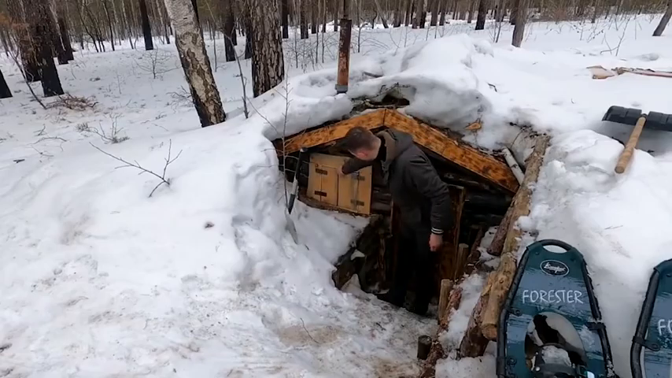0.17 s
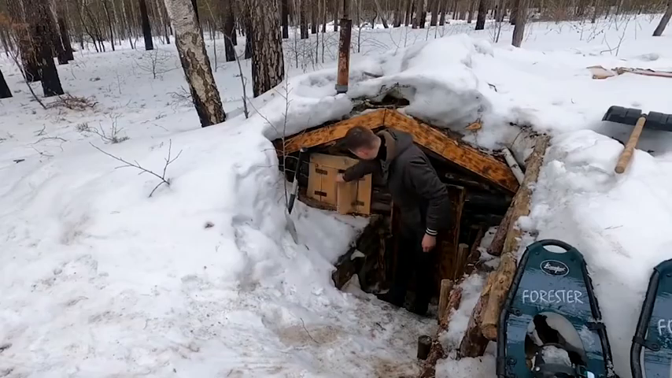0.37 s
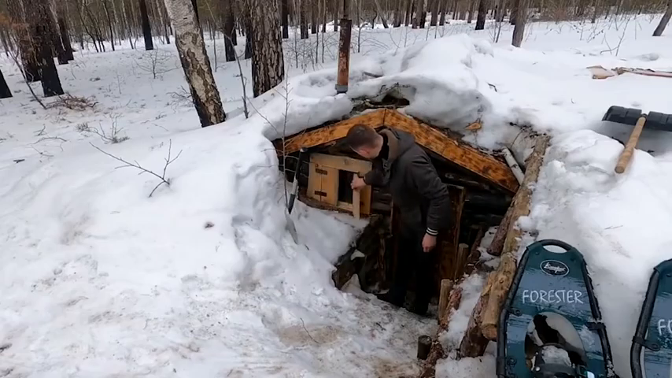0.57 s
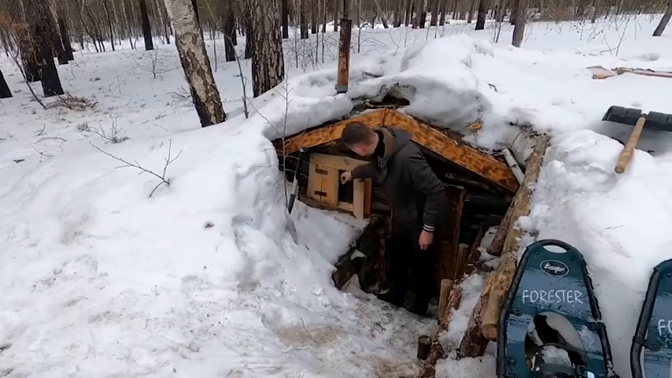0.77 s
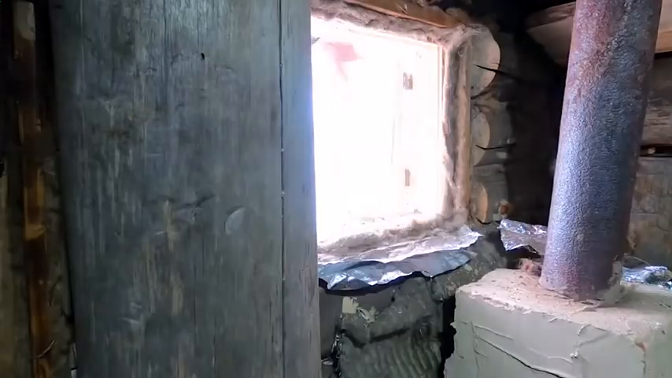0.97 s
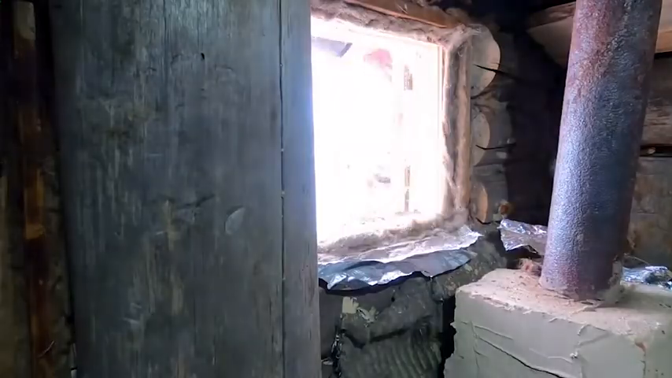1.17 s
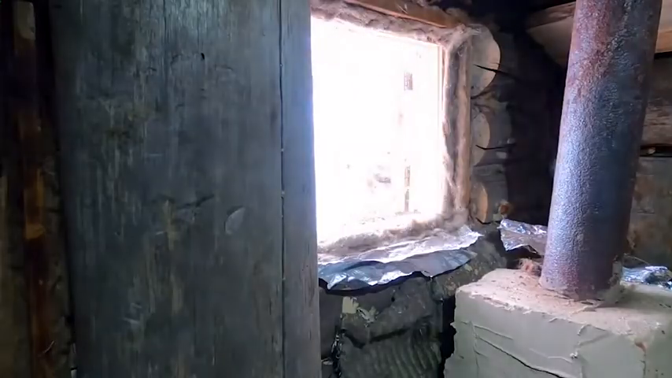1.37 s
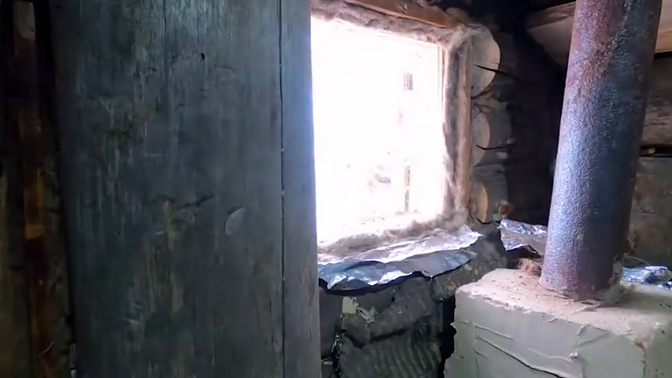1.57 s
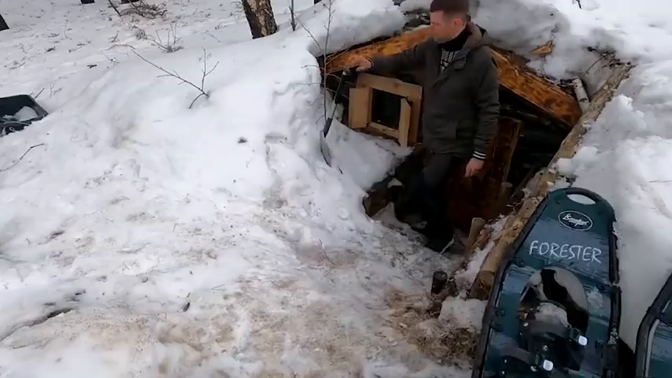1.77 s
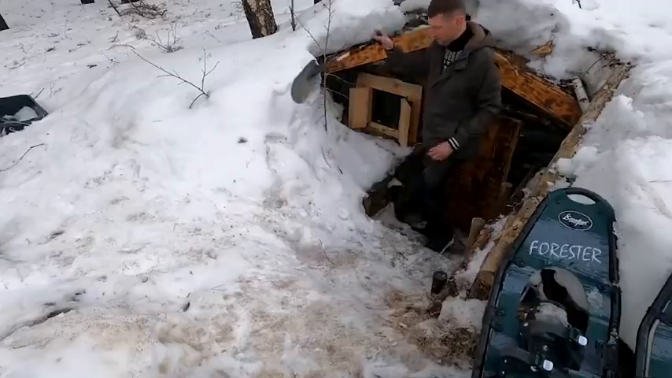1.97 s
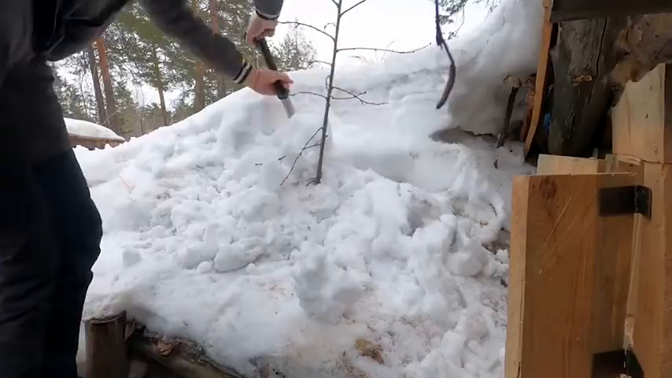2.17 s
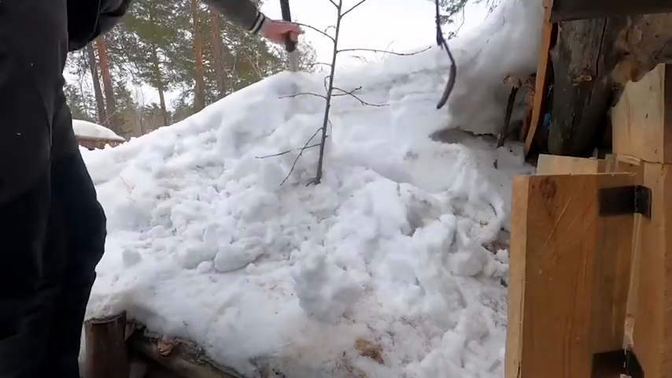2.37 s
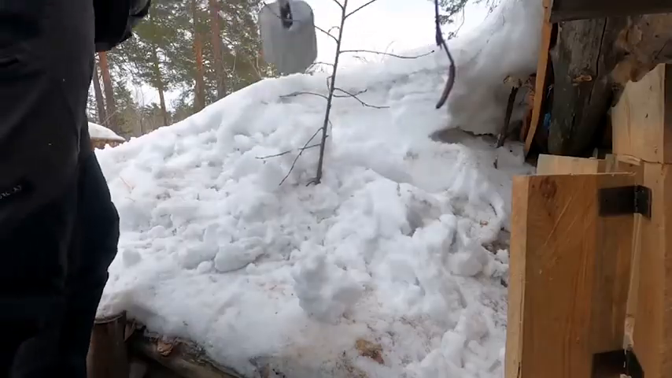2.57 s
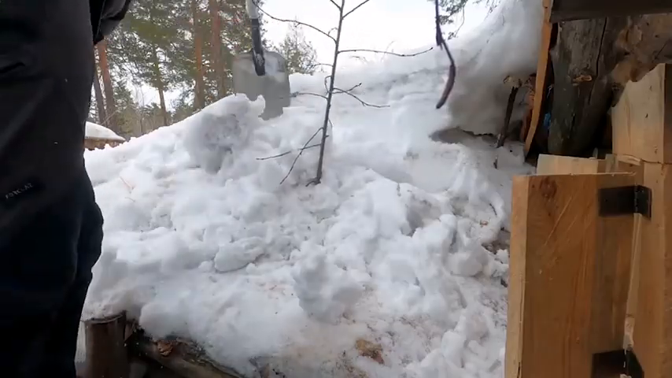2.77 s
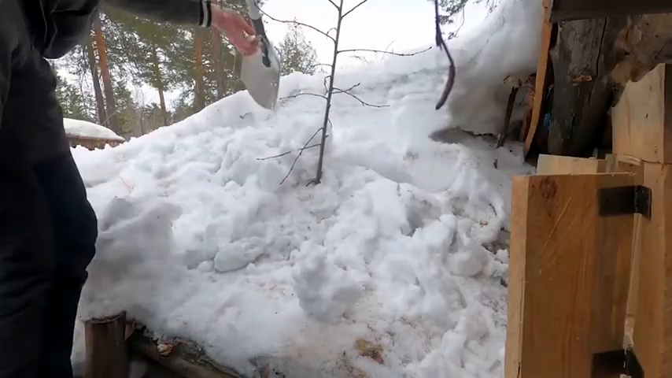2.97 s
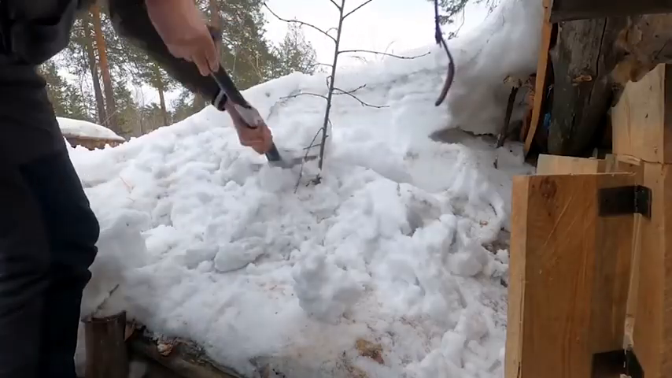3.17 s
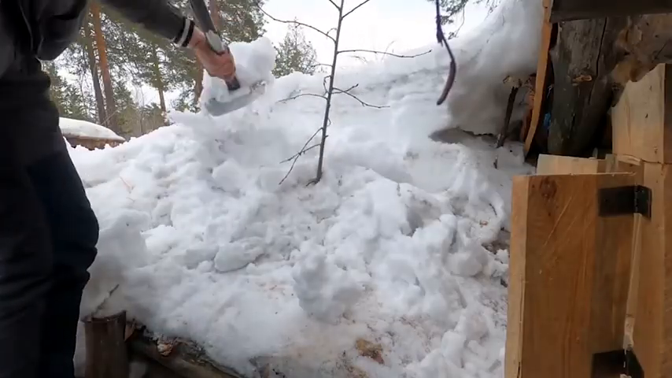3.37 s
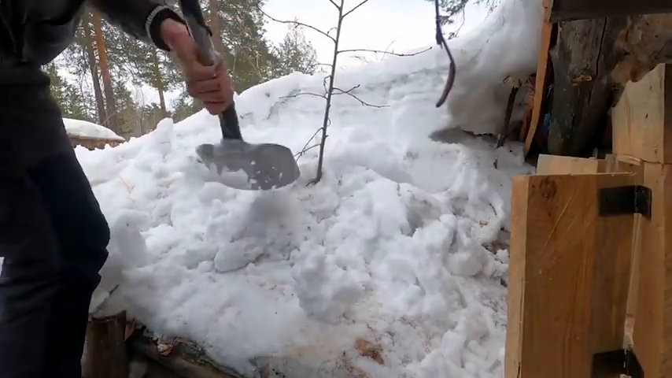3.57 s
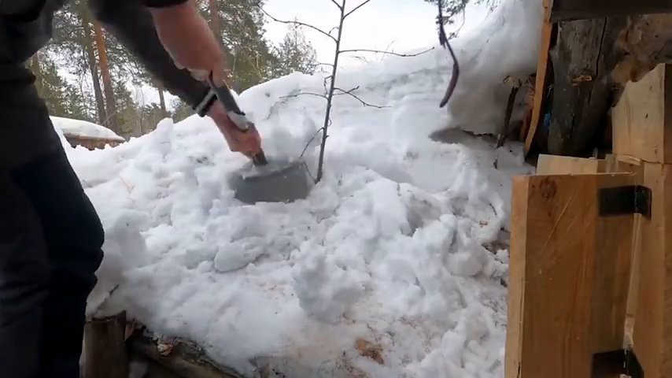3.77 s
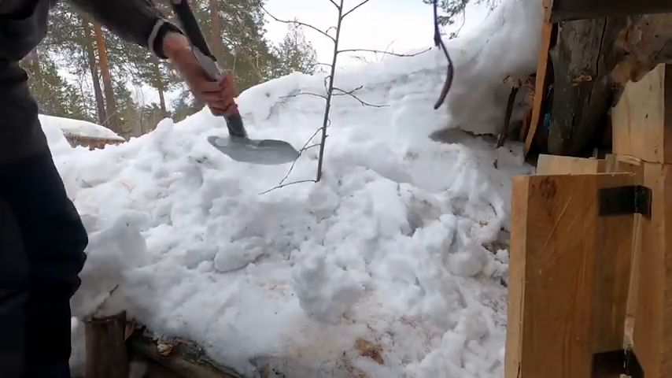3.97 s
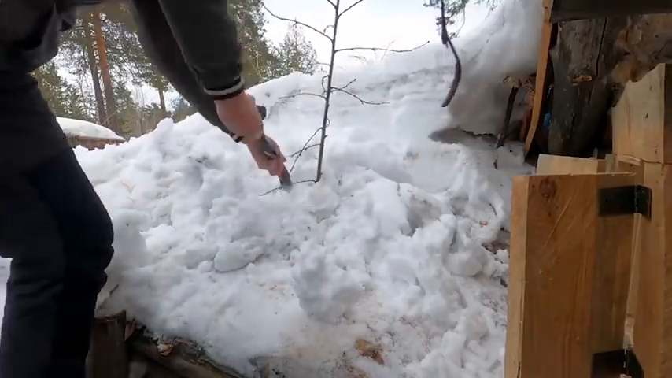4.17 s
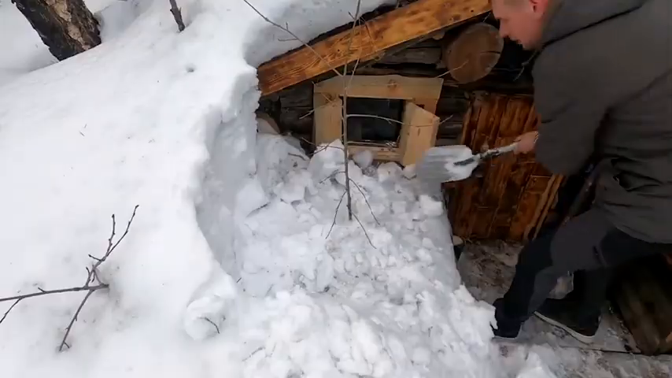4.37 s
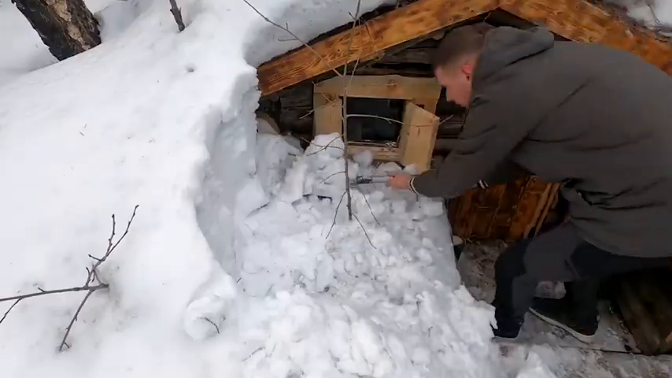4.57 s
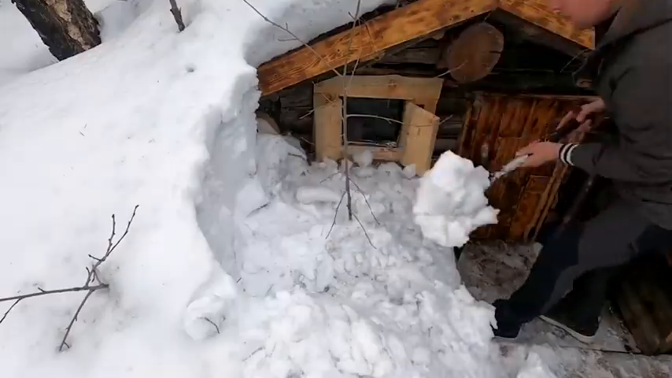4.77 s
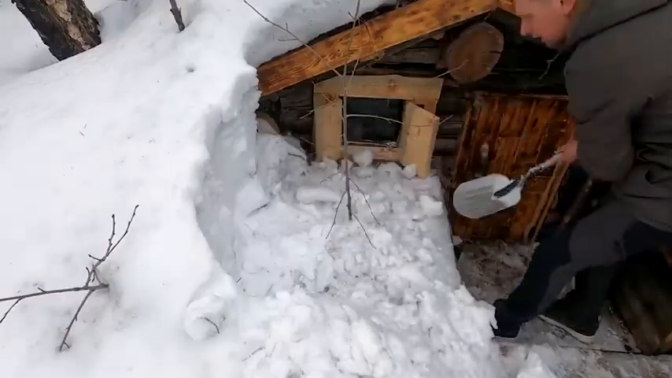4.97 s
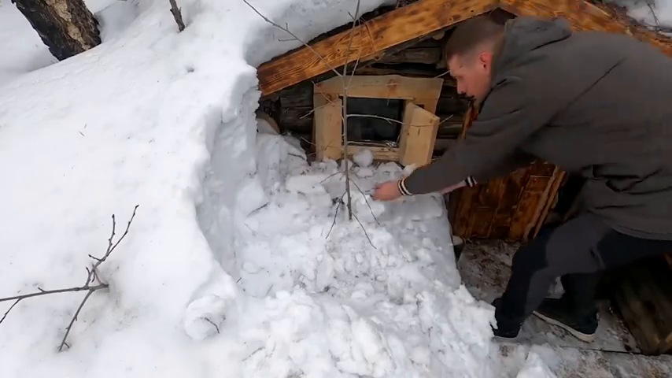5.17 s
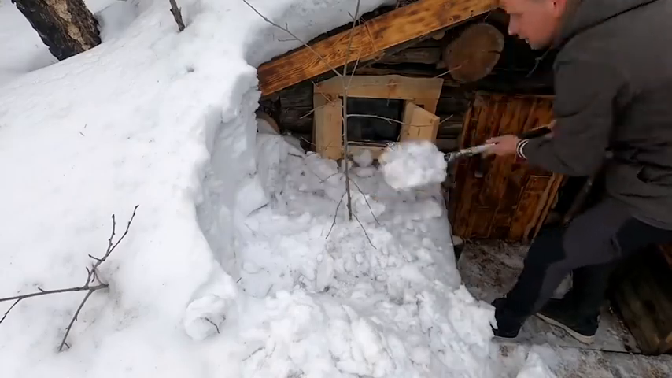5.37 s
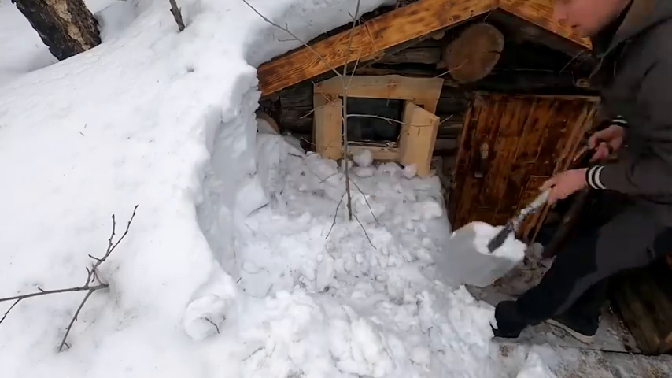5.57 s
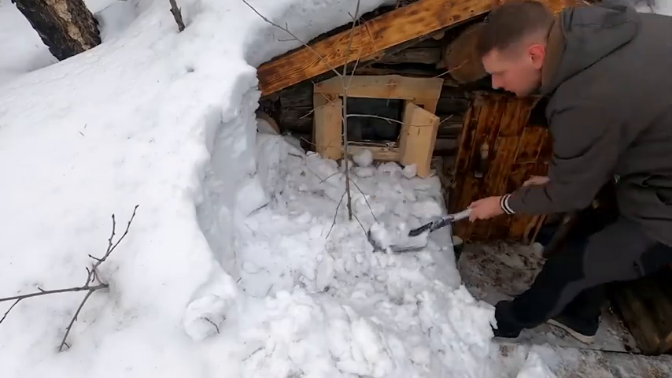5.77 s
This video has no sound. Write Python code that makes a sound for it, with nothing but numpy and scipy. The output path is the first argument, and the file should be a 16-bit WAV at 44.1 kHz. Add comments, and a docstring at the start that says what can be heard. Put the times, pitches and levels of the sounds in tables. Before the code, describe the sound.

Faint rustling and a short latch click open over soft forest air, followed by a dull knock of a wooden shutter from inside a quiet hut. Then a small metal shovel starts biting into packed snow near the microphone, stroke after stroke. The crust cracks, the blade colours each crunch with a slight metallic tone, and loose snow trickles between strokes. Soft thuds come through the ground, and low wind rumble touches the microphone late on.

```python
"""A small metal shovel chops, scrapes and tosses packed snow outside a wooden hut in a winter forest.
Brittle fracture makes dense clicks that the blade's resonances colour; crust snaps, loose snow slides.
Before the digging a latch clicks and a wooden shutter knocks, heard from indoors, both ringing in
damped modes. Under the forest hush the strokes thud through the ground, and from about 4.8 s wind
buffets the microphone."""
import sys
import numpy as np
from scipy import signal
from scipy.fft import rfft, irfft
from scipy.io import wavfile
from scipy.ndimage import uniform_filter1d

SR = 44100
rng = np.random.default_rng(int(sys.argv[2]) if len(sys.argv) > 2 else 0)


def int16_out(signal):
    """Quantize to a 16-bit WAV file."""
    q = np.round(np.clip(np.atleast_2d(signal).T, -1, 1) * 32767)
    wavfile.write(sys.argv[1], SR, q.astype(np.int16))


N = 256774
STEP = 16  # samples per point of a slow envelope
CREST_DB = 10  # peaks of noise over its mean level


# blade biting snow: start_s, level_db, relative fizz_db, body_db and thud_db, rise_s, t60_s
BITES = [(2.1458, -31.5, 6.5, -9, -17.5, 0.029, 0.027), (2.223, -45.5, -7, -18, -1, 0.04, 0.061),
         (2.264, -28, -0.5, -21, -41, .018, .11), (2.3885, -10.5, -3, -5, -16.5, 0.019, 0.13),
         (2.4192, -12.5, -6, -13, -3.5, 0.0063, 0.04), (2.505, -33, -1, -4, -1.5, .0074, .072),
         (2.535, -16, -5.5, -1.5, -18, 0.028, 0.065), (2.564, -21, -.5, -19, -39, 0.0078, .04),
         (2.621, -23, 3.5, -12, -23, 0.052, 0.03), (2.6373, -12, -11, -2, -16, 0.026, 0.035),
         (2.665, -18, -2, -7, -9, 0.01, 0.085), (2.7594, -20.5, -5.5, -9.5, -23.5, 0.025, 0.073),
         (2.802, -25.5, -2.5, -3, -22, 0.021, .04), (2.883, -5.5, -5, -11, -18, 0.016, 0.11),
         (3.035, -24.5, -12, -19, -24, 0.017, 0.11), (3.107, -6, -7, -10, -19.5, 0.023, 0.1),
         (3.131, -17, 5, -5.5, -36, 0.014, 0.07), (3.225, -18, -6, -30, -27.5, 0.02, 0.13),
         (3.417, -24.5, -8, -20, -15.5, 0.058, 0.094), (3.44, -12, 4, -14, -18.5, 0.022, 0.089),
         (3.583, -25.5, -2, -10.5, -31, 0.069, 0.042), (3.613, -24, 1.5, -34, -23, 0.018, 0.26),
         (3.7176, -15, -2.5, -19.5, -25, 0.033, 0.089), (3.8318, -12.5, -2, -7.5, -17, 0.015, 0.091),
         (3.8744, -10.5, 4.5, -14.5, -23.5, 0.06, 0.075), (3.997, -28.5, -8, -8, -17, 0.016, 0.067),
         (4.142, -20, 1, -24, -28.5, 0.012, 0.052), (4.174, -36.5, 7, -7, -9, .012, 0.079),
         (4.264, -23.5, 5, -40, -14.5, 0.013, 0.15), (4.316, -16, 8.5, -12.5, -23, 0.035, 0.093),
         (4.527, -22.5, 0, -40, -40, .056, 0.27), (4.581, -14.5, -5, -11, -28.5, 0.036, 0.13),
         (4.6949, -17, 7, 5.5, -44, .015, 0.086), (4.731, -14, -5.5, 2, -18, 0.073, 0.1),
         (5.111, -26.5, -13, -19, -41, 0.04, 0.053), (5.128, -16, 3, -5.5, -28, 0.027, 0.083),
         (5.247, -21.5, 2.5, -11, -14.5, 0.035, 0.035), (5.316, -11, 0.5, -14, -45, 0.024, 0.13),
         (5.3414, -8.5, -7, -1, -25.5, 0.016, 0.15), (5.4072, -13, -17, 1, -27, 0.021, .055),
         (5.479, -25, -36, -4.5, -29, .01, .11), (5.569, -42, 7, -25, -11, .037, 0.042),
         (5.757, -22.5, 4.5, -11, -8, 0.042, 0.064)]
def shovel(hold_s=.008, move_s=4.45):
    """Fracture under load: each bite crushes snow in three noise bands and thumps the packed bank."""
    body, middle, fizz, thud = np.zeros((4, 2, N))
    for s, db, fizz_db, body_db, thud_db, rise, t60 in BITES:
        pan = sides(-0.1 if s < move_s else -1.5)  # further right once the listener moves
        start = s - 0.59 * rise
        push = amp(db - CREST_DB) * pan * swell(rise, hold_s, t60, 1.06)
        brush = amp(db - 39.5) * pan * swell(0.017, 0, 0.018)  # the edge meets loose powder first
        add(middle, start - .016, brush)
        add(fizz, start - .016, brush * amp(fizz_db))
        add(middle, start, push)
        add(fizz, start, push * amp(fizz_db))
        add(body, start, push * amp(body_db))
        add(thud, start, amp(db + thud_db) * swell(rise, hold_s, 1.7 * t60)[None])
    bank = stereo(rng.standard_normal((2, N)), lambda hz: -12 * np.log2(hz / 190 + 0.00097) ** 2,
                  SNOW_COHERENCE)
    crunch = grains(per_s=8000, spread_db=1.9, patchy_db=4.5)
    return (np.array([body, middle, fizz]) * crunch).sum(0) + thud * unit_rms(bank)


# spectrum of breaking snow: frequency_hz, density_db
CRUNCH_SPECTRUM = [(240, -17), (400, -6.5), (620, -9), (770, -10), (900, -5.5), (1630, -5), (2390, -10),
                   (2540, -10.5), (3450, -6), (5290, -13.5), (8000, -15.5), (11500, -16.5), (13000, -30),
                   (15400, -63)]
# blade resonances: pitch_hz, width_hz, lift_db
BLADE_MODES = [(635, 62, 8), (990, 19, 2.5), (1283, 18, 3.5), (1652, 80, 1.5), (1895, 340, 3),
               (2110, 60, 5), (2323, 33, 10.5), (2783, 110, 3.5), (3580, 22, 2), (3740, 24, -5),
               (4860, 24, 12.5), (5340, 42, 7.5), (5410, 37, 6)]
def crunch_db(hz):
    """Resonance: the metal blade shapes the broad spectrum of breaking snow in narrow bands."""
    blade_db = sum(db / (1 + (2 * (hz - pitch) / width) ** 2) for pitch, width, db in BLADE_MODES)
    return curve(CRUNCH_SPECTRUM, hz) + blade_db


# left-right likeness of the snow: frequency_hz, coherence
SNOW_COHERENCE = [(60, 0.92), (180, 0.98), (550, 0.96), (1650, 0.65), (4960, 0.28), (15000, 0.22)]
def grains(per_s, spread_db, patchy_db):
    """Shot noise: crystals fracture as random clicks, a few large; returns body, middle and fizz."""
    size = amp(spread_db * np.minimum(rng.exponential(1, (2, N)), 3)) * rng.standard_normal((2, N))
    clicks = size * (rng.random((2, N)) < per_s / SR)
    crunch = stereo(clicks, crunch_db, SNOW_COHERENCE)
    # snow damps different parts of the blade in turn, so narrow bands drop out and return
    frames = signal.stft(crunch, nperseg=1024, noverlap=768)[2]
    patches = uniform_filter1d(rng.standard_normal(frames.shape[1:]), size=2, axis=0)
    patches = unit_rms(uniform_filter1d(patches, size=9, axis=1))
    frames *= amp(patchy_db * np.minimum(patches, 1.5))
    spectrum = rfft(signal.istft(frames, nperseg=1024, noverlap=768)[1][:, :N])
    hz = np.fft.rfftfreq(N, 1 / SR)
    low, high = 1 / (1 + (hz / 980) ** 8), 1 / (1 + (3500 / (hz + 1)) ** 4)
    return [unit_rms(irfft(spectrum * share, N)) for share in (low, 1 - low - high, high)]


# crust breaking: start_s, peak_db, pitch_hz, t60_s, pan_db
SNAPS = [(2.395, -7, 1630, 0.035, -4), (2.423, -4.5, 1560, 0.018, 7), (2.646, -5.5, 1550, 0.025, -3),
         (2.922, -33, 1650, 0.034, -8), (3.139, -9, 2030, 0.04, -16), (3.441, -3.5, 3480, 0.061, -2),
         (3.653, -10.5, 1780, 0.032, 0.5), (3.675, -18, 1430, 0.034, 0.0), (4.005, -27.5, 1380, 0.054, 0.5),
         (4.115, -18, 1440, 0.012, -2), (4.294, -7.5, 1720, 0.048, -1), (4.704, -2.5, 1060, 0.045, -2),
         (5.155, -8, 1960, 0.044, 1), (5.323, -6, 1430, 0.033, -5), (5.35, -18, 1660, 0.03, -13),
         (5.416, -14, 1040, 0.11, -1)]
def crust_snaps():
    """Brittle fracture: one sharp break, then a brief crumble, in a noise band around its pitch."""
    out, t = np.zeros((2, N)), np.arange(4000) / SR
    for s, db, hz, t60, pan_db in SNAPS:
        a, b = rng.standard_normal((2, len(t)))
        decay = amp(-60 * t / 0.0023) + 0.5 * amp(-60 * t / np.clip(t60, .01, .1))
        force = np.array([a + 0.083 * b, a - 0.24 * b]) * np.minimum(t / 0.0014, 1) * decay
        crack = band(force, 0.58 * hz, 1.82 * hz)
        add(out, s - .0007, amp(db) * sides(pan_db) * crack / abs(crack).max())
    return out


# snow leaving the blade: start_s, end_s, level_db, relative body_db, peak_position (0-1)
SPILLS = [(2.14, 2.505, -46, -11, 0.52), (2.483, 2.85, -40.5, -12, 0.6), (2.89, 3.1, -39.5, -10, 0.24),
          (3.09, 3.496, -39.5, -12.5, 0), (3.533, 3.798, -39, -37, .35), (3.808, 3.95, -30, -11, 0.8),
          (3.965, 4.139, -38, -31, 0.61), (4.136, 4.246, -41.5, -24, 0.14), (4.241, 4.42, -36.5, -24, 0.54),
          (4.402, 4.674, -32.5, -21, 0.46), (4.674, 4.874, -48, -20, 0.67), (4.86, 5.016, -49.5, -28, .6),
          (5.02, 5.19, -50, 4, 0.68), (5.205, 5.594, -41, -14, 0.19), (5.635, 5.908, -55.5, -3, 0.8)]
def sliding_snow(thinning_db=18.5):
    """Granular flow: finer, denser grains trickle off the blade, swelling to a peak and thinning."""
    flow = 0
    for start, end, top_db, body_db, peak in SPILLS:
        gate, progress = spell(start, end, edge_s=0.018)
        db = top_db - thinning_db * np.interp(progress, [0, np.clip(peak, .05, .95), 1], [1, 0, 1]) ** 2
        fizz_db = 1 - 0.38 * (db + 49.5)  # heavier flow sounds duller
        flow = flow + gate * amp([db + body_db, db, db + fizz_db])
    return (upsample(flow)[:, None] * grains(per_s=15000, spread_db=1.2, patchy_db=5)).sum(0)


# shutter blows: start_s, level_db
KNOCKS = [(1.29, -47.5), (1.3, -31.5), (1.307, -23), (1.319, -23.5), (1.329, -19.5)]
# modes of the panel: pitch_hz, level_db, t60_s
SHUTTER_MODES = [(98, -14, 0.039), (136.7, 8.5, 0.14), (201, 0.5, 0.071), (383, -5, 0.069),
                 (538, 5.5, 0.022), (830, -2, 0.037), (1330, 0, 0.044), (2017, -21, 0.054),
                 (2420, -15.5, 0.055)]
def shutter():
    """Impact excitation: a cluster of blows rings the low modes of a wooden panel."""
    return struck(KNOCKS, SHUTTER_MODES, rattle_db=0.93, rise_s=0.0075, rattle_t60_s=0.038)


# latch clacks: start_s, level_db
CLACKS = [(0.509, -39.5), (0.531, -38), (0.536, -34.5), (0.541, -32), (0.5455, -20), (0.553, -30)]
# modes of the latch: pitch_hz, level_db, t60_s
LATCH_MODES = [(303, -13.5, 0.027), (673, -19, 0.041), (1055, -4, 0.016), (1790, -8, 0.016),
               (2630, -1, 0.0066), (3530, -4.5, 0.023), (3660, 1, 0.011), (4540, -10.5, 0.029),
               (6320, -0.5, 0.0067)]
def latch():
    """Impact excitation: quick contacts ring the high, short-lived modes of a small body."""
    return struck(CLACKS, LATCH_MODES, rattle_db=2.6, rise_s=0.0022, rattle_t60_s=0.042)


def struck(blows, modes, rattle_db, rise_s, rattle_t60_s):
    """Modal superposition: damped sines over a short rattle; every blow lands a little differently."""
    out, t = np.zeros((2, N)), np.arange(SR // 4) / SR
    for s, db in blows:
        scatter = rng.uniform(-1, 1, (len(modes), 2)) * [3, .04]
        ring = 0
        for (hz, mode_db, t60), (shift_db, detune) in zip(modes, scatter):
            decay = amp(mode_db + shift_db - 60 * t / min(t60, .09))
            ring = ring + decay * np.sin(2 * np.pi * hz * (1 + detune) * t)
        a, b = band(rng.standard_normal((2, len(t))), 200, 3640)
        rattle = amp(rattle_db - 60 * t / rattle_t60_s) * np.array([a + 0.16 * b, a - 0.11 * b])
        add(out, s - .001, amp(db) * (ring + rattle) * fade_in(t / rise_s))
    return out


# jolts from handling and late gusts: start_s, level_db, pitch_hz, t60_s, pan_db
BUMPS = [(1.091, -48.5, 112, 0.081, -5), (1.128, -59, 164, 0.041, 11), (1.237, -56, 169, 0.09, -1),
         (1.267, -51, 143, 0.082, -1), (1.36, -50, 145, 0.037, -1), (1.378, -45, 115, 0.086, -3),
         (1.405, -44.5, 117, 0.055, 1), (1.577, -60, 117, 0.04, 4), (1.6, -58.5, 81, 0.038, 12),
         (2.24, -41, 131, 0.055, 0), (2.338, -39, 167, 0.078, -2), (3.983, -39, 61.5, 0.091, 8),
         (4.453, -22, 112, 0.013, 2), (4.868, -33.5, 112, 0.11, 20), (4.884, -30, 121, 0.063, 11.5),
         (4.989, -29.5, 97, 0.082, 19), (5.008, -40, 61.9, 0.049, 3.5), (5.094, -42, 115, 0.053, 6),
         (5.269, -26, 61.9, 0.045, -2), (5.548, -18.5, 124, 0.01, 5), (5.719, -38, 205, 0.085, 11)]
def microphone_bumps():
    """Damped oscillation: each jolt gives a few soft low cycles, falling in pitch."""
    out = np.zeros((2, N))
    for s, db, hz, t60, pan_db in BUMPS:
        shape = swell(0.0053, 0.0014, t60)
        t = np.arange(len(shape)) / SR
        cycles = hz * (t + 0.00089 * (1 - np.exp(-t / .008)))
        add(out, s - .003, amp(db) * sides(pan_db) * shape * np.sin(2 * np.pi * cycles))
    return out


# low rumbles: centre_s, level_db, half_width_s, pan_db, relative upper_band_db
RUMBLES = [(2.26, -59.5, 0.04, -12, 22.5), (2.39, -50, .06, -4, -6), (2.63, -49, 0.11, -2, 2),
           (2.91, -40, 0.062, 2, 3.5), (3.23, -54, .06, -3, -1), (3.46, -48, 0.055, -7, 2),
           (3.62, -42.5, 0.034, 1, 0), (3.88, -32, 0.053, 2, -0.5), (3.99, -58, .06, 10, -12),
           (4.31, -51, 0.072, -2, 8), (4.46, -60, 0.045, 2, -1), (4.64, -57, 0.087, 1, 9.5),
           (4.85, -37, 0.049, 16, -11), (4.99, -42, 0.055, 15, -9), (5.11, -35, 0.13, 7.5, 0),
           (5.29, -30.5, 0.061, 7, -4), (5.4, -51, .1, 12, 1), (5.51, -36, 0.081, -4, -9),
           (5.66, -36.5, 0.063, 5, -9.5), (5.76, -32.5, 0.073, 12, 0)]
def low_rumble(floor_db=-65, floor_from_s=2.15, drop_db=21.5):
    """Ground-borne vibration from shovel strokes, then from about 4.8 s wind on the microphone."""
    t = slow_time()
    lower = upper = amp(floor_db) * (t > floor_from_s) * np.ones((2, 1))
    for s, db, half_width, pan_db, upper_db in RUMBLES:
        surge = sides(pan_db) * amp(db - drop_db * abs(t - s) / half_width)
        lower, upper = lower + surge, upper + amp(upper_db) * surge
    a, b, flutter = rng.standard_normal((3, N))
    pressure = np.array([a + .5 * b, a - .5 * b])
    lumps = amp(2.1 * unit_rms(uniform_filter1d(uniform_filter1d(flutter, 900), 900)))
    deep = upsample(lower) * unit_rms(band(pressure, 26.4, 48.7))
    return deep + upsample(upper) * unit_rms(band(pressure, 79, 135)) * lumps


# spells of forest air: start_s, end_s, first_db, last_db, relative middle_db and treble_db
HUSH_SPELLS = [(0, 1.071, -51.5, -51, -3.5, -6), (1.07, 1.202, -67.5, -71, -7, 5),
               (1.247, 1.429, -71, -63, -4, 6.5), (1.49, 1.513, -80, -76, -4, 7),
               (1.554, 1.641, -70.5, -74, -2.5, 5.5), (1.654, 1.707, -85.5, -83, -9, 7),
               (1.73, 1.83, -73.5, -74, -3, 5.5), (1.818, 2.292, -65.5, -54, 3, -3),
               (2.293, 2.86, -57, -53.5, -1, -10), (2.874, 4.3, -48.5, -52.5, -7.5, 9),
               (4.308, 4.806, -40.5, -48, -6.5, 0), (4.8, 5.9, -54, -48.5, -6, -2.5)]
# spectrum of the air: frequency_hz, density_db
HUSH_SPECTRUM = [(20, -35), (50, -14.5), (92, -22), (164, -3), (280, -7), (420, -3.5), (700, -6.5),
                 (1880, -17.5), (3440, -25.5), (6920, -27.5), (9000, -35.5), (15000, -55)]
# its left-right likeness: frequency_hz, coherence
HUSH_COHERENCE = [(60, 0.4), (380, 0.67), (2380, 0.25), (15000, 0.12)]
def forest_hush(floor_db=-90.5):
    """Diffuse flow noise: distant air in the trees, which indoors only cuts in now and then."""
    air = stereo(rng.standard_normal((2, N)), lambda hz: curve(HUSH_SPECTRUM, hz), HUSH_COHERENCE)
    air /= np.std(band(air, 250, 1000))
    gains = amp(floor_db) * np.array([[1], [0], [0]])
    for start, end, first_db, last_db, middle_db, treble_db in HUSH_SPELLS:
        gate, progress = spell(start, end, edge_s=0.02)
        lifts = np.array([[1], [amp(middle_db) - 1], [amp(treble_db) - 1]])
        gains = gains + lifts * gate * amp(first_db + (last_db - first_db) * progress)
    whole, middle, treble = upsample(gains)
    return whole * air + middle * band(air, 314, 1000) + treble * band(air, 1700, 11000)


# faint footfalls and cloth: start_s, peak_db, t60_s
RUSTLES = [(0.0154, -43, 0.16), (0.0976, -42, 0.47), (0.268, -47, 0.091), (0.4794, -49.5, 0.29),
           (0.679, -47, 0.39)]
def rustles():
    """Friction noise: feet and cloth nearby give short, decaying bursts of hiss."""
    envelope = np.zeros((2, N))
    for s, peak_db, t60 in RUSTLES:
        add(envelope, s, amp(peak_db - CREST_DB) * swell(0.0033, 0.013, t60)[None])
    return envelope * unit_rms(band(rng.standard_normal((2, N)), 740, 6200))


def stereo(source, tone_db, coherence):
    """Partial coherence: two unrelated signals, coloured, add on the left and subtract on the right."""
    hz = np.fft.rfftfreq(N, 1 / SR)
    a, b = rfft(source) * amp(tone_db(hz))
    spread = np.arccos(np.clip(curve(coherence, hz), 0, 1)) / 2
    mid, side = a * np.cos(spread), b * np.sin(spread)
    return irfft([mid + side, mid - side], N)


def swell(rise_s, hold_s, t60_s, round_off=1):
    """Smooth rise, hold, then a 60 dB decay of at most 0.4 s; round_off above 1 starts it gently."""
    t60_s = np.clip(t60_s, .01, .4)
    t = np.arange(round((rise_s + hold_s + t60_s) * SR)) / SR
    return fade_in(t / rise_s) * amp(-60 * (np.maximum(t - rise_s - hold_s, 0) / t60_s) ** round_off)


def spell(start, end, edge_s):
    """A soft-edged gate and the share of it gone by, both in slow time."""
    t = slow_time()
    gate = fade_in(np.minimum(t - start, end - t) / edge_s + .5)
    return gate, np.clip((t - start) / (end - start), 0, 1)


def fade_in(progress):
    return np.sin(np.pi / 2 * np.clip(progress, 0, 1)) ** 2


def slow_time():
    return np.arange(0, N, STEP) / SR


def upsample(envelope):
    return uniform_filter1d(np.repeat(envelope, STEP, axis=-1)[..., :N], size=STEP, axis=-1)


def amp(db):
    return 10 ** (np.asarray(db) / 20)


def unit_rms(x):
    return x / np.sqrt(np.mean(x ** 2) + 1e-20)


def curve(points, hz):
    point_hz, value = np.transpose(points)
    return np.interp(np.log(hz + 1), np.log(point_hz + 1), value)


def add(mix, s, sound):
    part = mix[:, max(round(s * SR), 0):][:, :sound.shape[1]]
    part += sound[:, :part.shape[1]]


def sides(pan_db):
    """Level panning: the left gain exceeds the right by pan_db."""
    return amp([[pan_db / 2], [-pan_db / 2]])


def band(x, lo_hz, hi_hz):
    return signal.sosfilt(signal.butter(2, [lo_hz, hi_hz], "band", fs=SR, output="sos"), x)


def scene():
    """Superposition: the pressures of all sources add."""
    hut = shutter() + latch()
    digging = shovel() + sliding_snow() + crust_snaps()
    return digging + hut + forest_hush() + rustles() + microphone_bumps() + low_rumble()


def record(dry, shelf_hz=8450, edge_hz=15600):
    """Saturation and band limiting: the microphone rounds off peaks and drops 22 dB above its shelf."""
    hz = np.fft.rfftfreq(N, 1 / SR)
    dull = irfft(rfft(np.tanh(dry)) * amp(-22 / (1 + (shelf_hz / (hz + 1)) ** 40)), N)
    lowpass = signal.firwin(511, edge_hz, window=("kaiser", 9), fs=SR)
    return signal.oaconvolve(dull, lowpass[None], "same")


dry = scene()
out = record(dry)
int16_out(out)
```